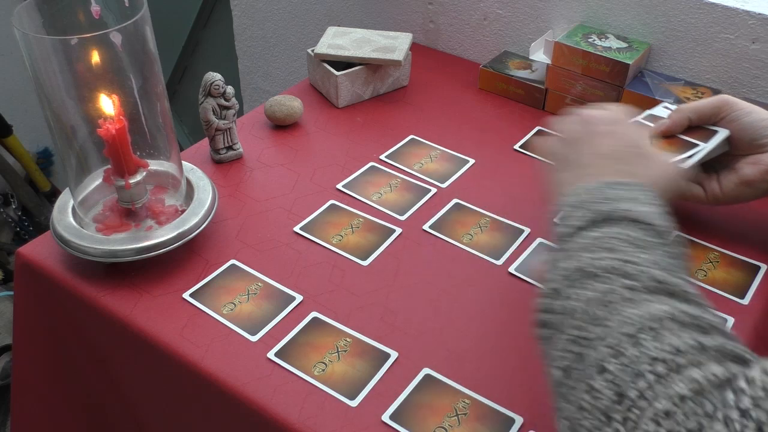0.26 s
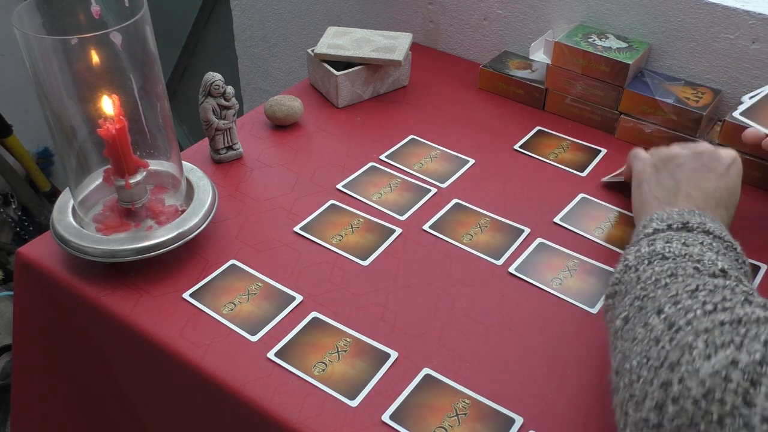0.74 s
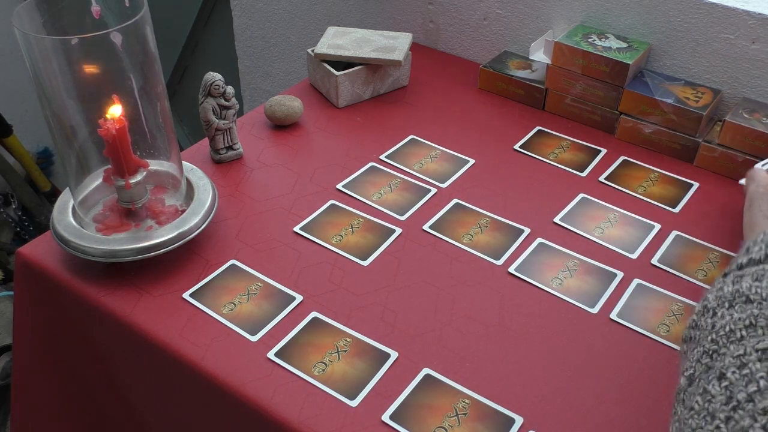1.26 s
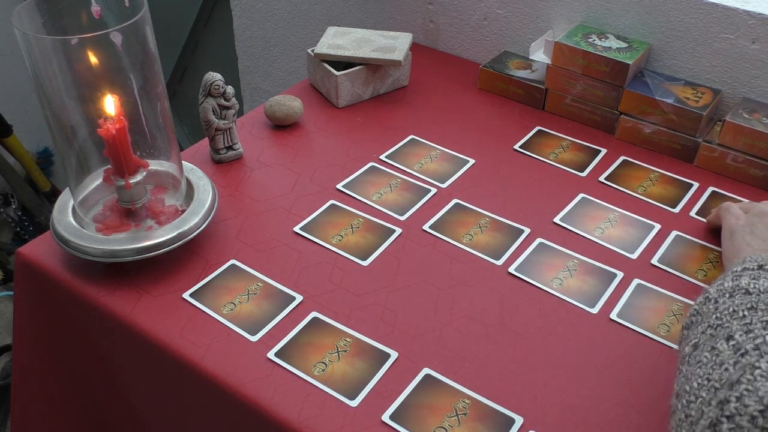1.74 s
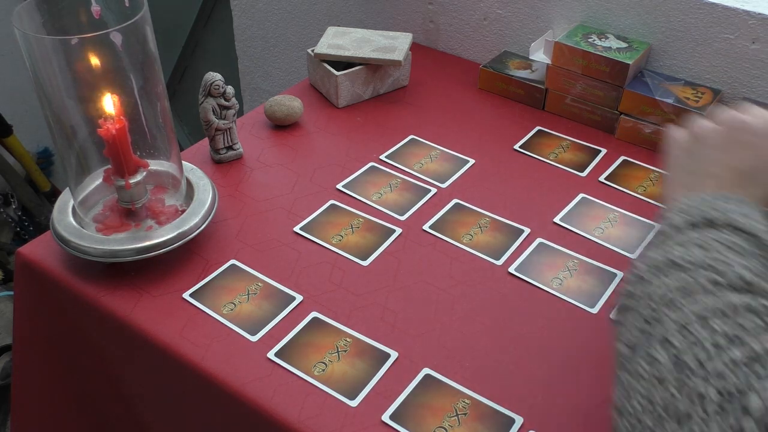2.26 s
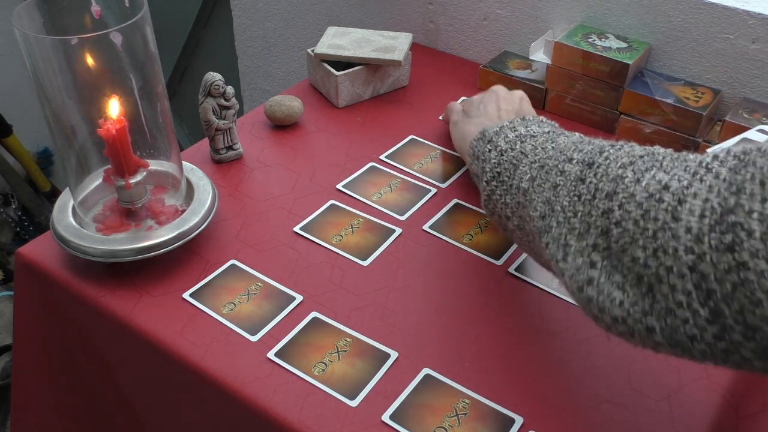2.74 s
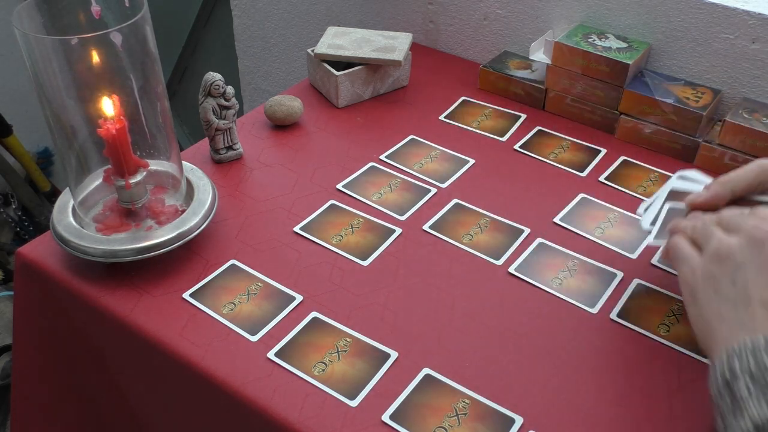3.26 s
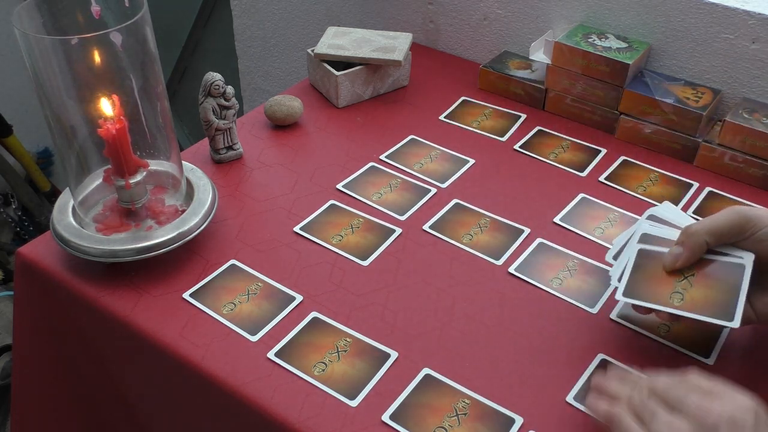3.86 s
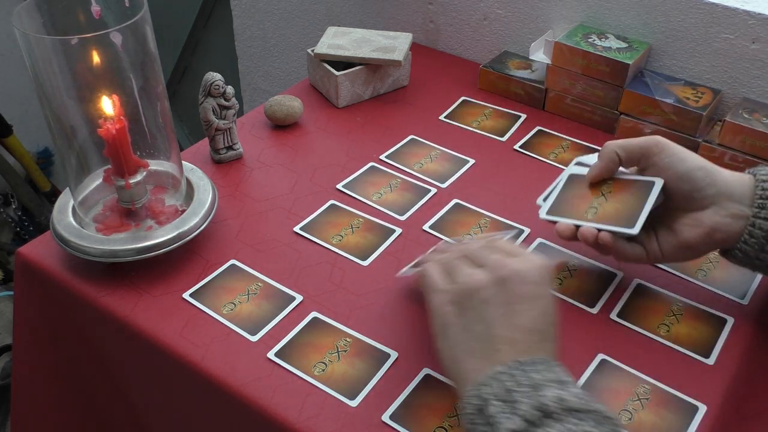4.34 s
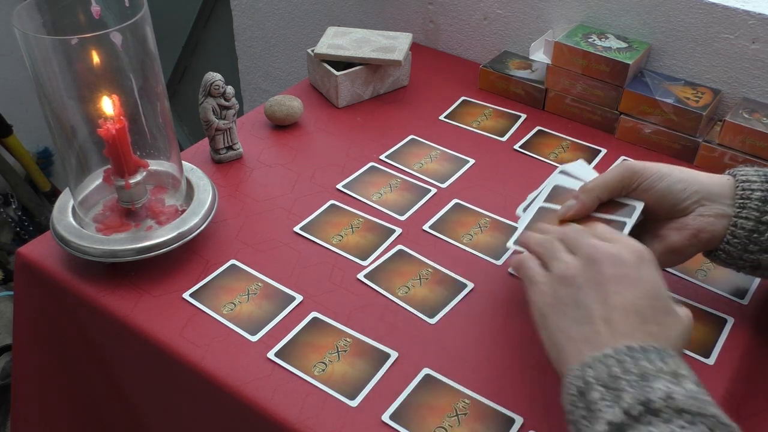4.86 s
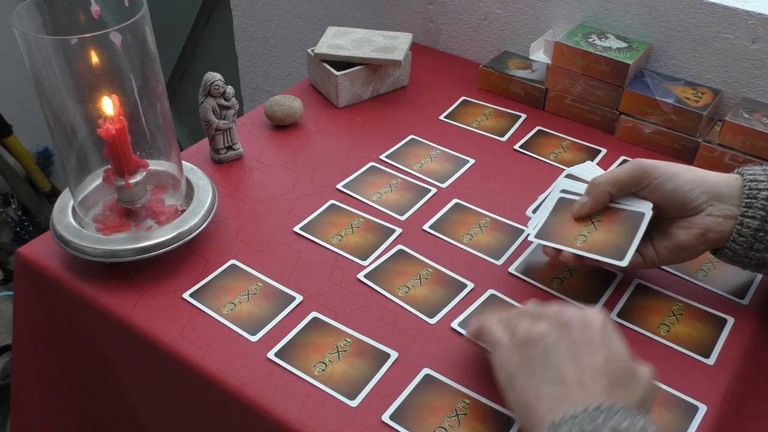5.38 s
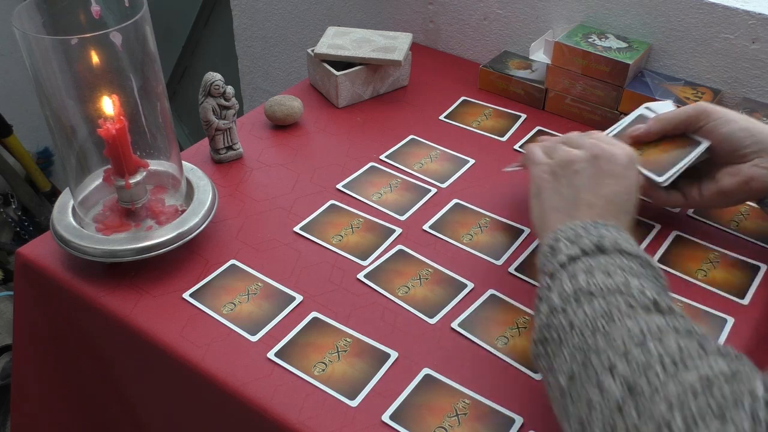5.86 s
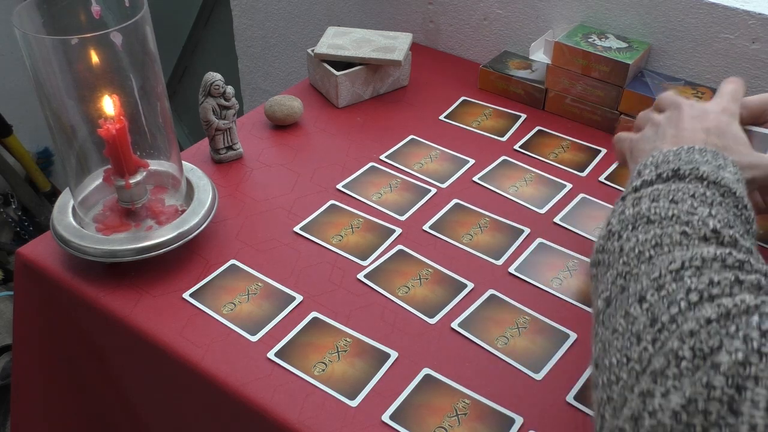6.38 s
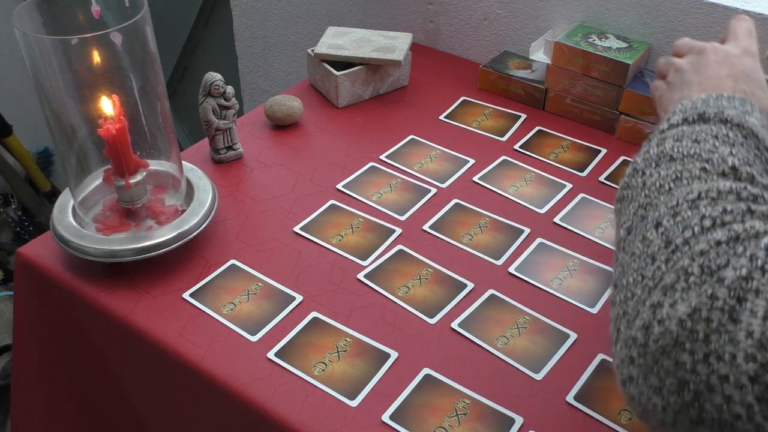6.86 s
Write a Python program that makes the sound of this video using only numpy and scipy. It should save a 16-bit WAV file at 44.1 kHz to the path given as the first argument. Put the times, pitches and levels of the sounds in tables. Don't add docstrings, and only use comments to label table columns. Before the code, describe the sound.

Close, crisp card flicks, slaps and short papery scrapes on a cloth-covered wooden table, with faint table knocks and unsteady background hiss.

```python
import sys
import numpy as np
from scipy import signal
from scipy.fft import rfft, irfft, next_fast_len
from scipy.io import wavfile
from scipy.ndimage import uniform_filter1d, minimum_filter1d

SR = 44100
rng = np.random.default_rng(int(sys.argv[2]) if len(sys.argv) > 2 else 0)


def how_loud(loudness_db):
    steps = np.asarray(loudness_db, float) / 20
    return 10 ** steps


def log_audio(samples):
    frames = np.atleast_2d(samples).T
    limited = np.clip(frames, -1, 1)
    pcm = np.round(limited * 32767).astype(np.int16)
    wavfile.write(sys.argv[1], SR, pcm)


N = 313986
LIFE = 15000


def unit(x):
    return x / np.sqrt(np.mean(x ** 2) + 1e-20)


def along(points, hz):
    f, v = np.transpose(points)
    return np.interp(np.log(hz + 1), np.log(f + 1), v)


def curve(rows):
    s, value = np.transpose(rows)
    return np.interp(np.arange(N) / SR, s, value)


def filtered(x, response):
    size = next_fast_len(x.shape[-1] + 4096)
    spectrum = rfft(x, size) * response(np.fft.rfftfreq(size, 1 / SR))
    return irfft(spectrum, size)[..., :x.shape[-1]]


def causal(gain):
    cepstrum = irfft(np.log(gain + 1e-6))
    half = len(cepstrum) // 2
    cepstrum[1:half] *= 2
    cepstrum[half + 1:] = 0
    return np.exp(rfft(cepstrum, len(cepstrum)))


def patchy(shape, patchy_db, t60=None):
    hz, t, z = signal.stft(rng.standard_normal(shape), SR, nperseg=256)
    field = rng.standard_normal(z.shape[-2:])
    field = uniform_filter1d(field, size=3, axis=0)
    field = uniform_filter1d(field, size=12, axis=1)
    fade_db = 0 if t60 is None else -60 * t / along(t60, hz)[:, None]
    noise = signal.istft(z * how_loud(patchy_db * unit(field) + fade_db), SR, nperseg=256)[1]
    return noise[..., :shape[-1]]


def add(track, s, sound):
    part = track[:, max(round(s * SR), 0):][:, :sound.shape[-1]]
    part += sound[..., :part.shape[-1]]


def card(x, bends_hz, treble_db, bump_db, sharp):
    # (frequency [Hz], level [dB per Hz])
    paper = [(60, -40), (260, -12), (450, -6.5), (563, -15.5), (759, -13.5), (1300, -1.5), (3230, -2.5),
             (3640, -1), (4050, -2), (4230, -1), (5380, -2), (11500, -6.5), (14600, -9.5), (16000, -31)]
    f = np.fft.rfftfreq(LIFE, 1 / SR)
    humps_db = sum(bump_db * np.exp(-(sharp * np.log((f + 1) / hz)) ** 2) for hz in bends_hz)
    shelf_db = (treble_db + 8.5) / (1 + (5000 / (f + 1)) ** 3)
    return irfft(rfft(x) * causal(how_loud(along(paper, f) + humps_db + shelf_db)), LIFE)


def in_room(dry, spread, room_db):
    # (frequency [Hz], t60 [s])
    room_t60 = [(500, 0.29), (2000, 0.24), (5000, 0.28), (10000, 0.21), (16000, 0.17)]
    # (time [s], level [dB])
    walls = [(.0045, -1), (.008, -5), (.012, -6), (.0167, -10), (.024, -4)]
    t = np.arange(LIFE) / SR
    tail = patchy((2, LIFE), patchy_db=2, t60=room_t60) * np.clip((t - 0.003) / 0.0044, 0, 1)
    tail *= 1 + 0.25 * np.exp(-t / 0.013)
    tail /= np.linalg.norm(tail[0])
    for s, db in walls:
        at = round((s + rng.normal(0, 0.0007)) * SR)
        tail[:, at] += how_loud(db - 10.5) * rng.choice([-1, 1], size=2)
    wet = signal.fftconvolve(spread[None], tail, axes=1)[:, :LIFE]
    return dry * [[1], [-0.4]] + how_loud(room_db) * wet


def snaps():
    # (time [s], peak level [dB], low bend [Hz], high bend [Hz])
    flicks = [
        (0.4824, -18, 1200, 2990),
        (1.0257, -6, 4000, 5240),
        (3.7423, -18, 2770, 8500),
        (5.2603, -5, 1610, 9400),
        (6.1724, -8, 4400, 6700),
        (6.3394, -20, 1140, 6400),
    ]
    ticks = [
        (1.0153, 5, 2420, 3280),
        (3.2163, -17.5, 3070, 4630),
        (3.3126, -24, 2270, 3820),
        (3.361, -18.5, 1880, 3490),
        (3.6485, -13.5, 1420, 5140),
        (3.8938, -9.5, 3000, 4540),
        (4.1148, -20.5, 1650, 3800),
        (4.1371, -11, 3020, 4130),
        (5.7105, -13.5, 1250, 3650),
        (6.1629, -1, 1770, 3850),
    ]
    edges = [
        (4.7304, -15.5, 4050, 6300),
        (0.1526, 3.5, 2730, 4960),
        (1.3906, -14, 1960, 3180),
        (2.1295, -12.5, 1900, 3800),
        (2.3289, 1, 1030, 3200),
        (2.6, -1, 3220, 5600),
        (5.1724, -17.5, 2150, 4430),
        (5.438, -14, 1420, 3870),
        (5.7628, -6.5, 1270, 3480),
        (6.219, 0.5, 2450, 4900),
    ]
    pats = [
        (2.2205, -0.5, 1090, 5300),
        (2.7601, -1, 1890, 3150),
        (3.382, -18, 1400, 2940),
        (3.6856, -11.5, 1700, 3970),
        (5.021, -23.5, 1380, 3500),
        (5.2113, -7.5, 1320, 2100),
        (5.237, -9.5, 1194, 2840),
        (5.5553, -9, 1130, 5700),
        (6.0425, -0.5, 2150, 3180),
    ]
    flops = [
        (4.476, -8, 1650, 2550),
        (1.8332, -15, 1680, 3500),
        (0.4744, -24, 1030, 3580),
        (0.824, -10, 1400, 2500),
        (1.2, -28, 2500, 3630),
        (1.2, -28, 1450, 4220),
        (1.2, -26, 1700, 2500),
        (1.6424, -15, 1700, 3900),
        (6.0326, -10, 1700, 5200),
    ]
    # (events, treble [dB], room [dB])
    kinds = [(flicks, -4.5, -10.5), (ticks, -15, -6), (edges, -13, -3.5), (pats, -23, -4), (flops, -10.5, 3.6)]
    out, t = np.zeros((2, N)), np.arange(LIFE) / SR
    for rows, treble_db, room_db in kinds:
        for s, peak_db, low_hz, high_hz in rows:
            burst = rng.standard_normal(LIFE) * np.exp(-t / 0.0019) * (1 - np.exp(-t / 0.00032))
            pulse = np.roll(t == 0, 12) * np.linalg.norm(burst)
            bends_hz = (low_hz, high_hz)
            click = card(burst + 0.43 * pulse, bends_hz, treble_db - 4, bump_db=10.5, sharp=4.7)
            spread = card(0.3 * burst + pulse, bends_hz, treble_db, bump_db=8.5, sharp=7)
            level = how_loud(peak_db) / np.abs(click).max()
            add(out, s + 0.00024, level * in_room(click, spread, room_db + 6))
    return out


def slides():
    # (time of loudest moment [s], rms level [dB], card pitch [Hz], length [s])
    draws = [(0.04, -31, 2500, 0.084), (0.14, -15.5, 1200, 0.0043), (0.633, -18.5, 3160, 0.051),
             (0.716, -28.5, 2500, .038), (.878, -11.5, 2360, 0.038), (1, -25.5, 2500, 0.046),
             (1.366, -25, 4000, 0.03), (1.508, -19, 3300, 0.024), (1.85, -26, 3650, 0.07),
             (2.297, -14.5, 1150, 0.0063), (2.311, -24, 1100, .0045), (2.315, -12.5, 1930, 0.017),
             (3.7, -26, 3900, 0.019), (3.867, -34.5, 4000, 0.023), (5.022, -36, 2520, 0.039),
             (5.137, -32, 2500, 0.056), (5.21, -18, 1300, .0065), (5.442, -17, 1500, 0.0047),
             (5.699, -23.5, 3500, 0.014), (5.898, -32, 2500, 0.11), (6.156, -23.5, 1700, 0.014),
             (6.519, -32, 2480, 0.03), (6.781, -38, 3500, 0.033), (7.099, -32.5, 2500, 0.062)]
    # (time of loudest moment [s], rms level [dB], card pitch [Hz], length [s])
    skids = [(.48, -28.5, 2500, 0.089), (0.846, -17, 1400, 0.03), (1.661, -16, 2830, 0.04),
             (2.163, -24, 2960, 0.032), (2.619, -5, 3660, .024), (2.655, -16, 1520, 0.056),
             (3.201, -40.5, 2500, .053), (3.365, -34, 3500, 0.048), (3.76, -30.5, 2500, 0.022),
             (3.891, -23.5, 1450, 0.0092), (4.303, -37, 2430, 0.058), (4.33, -62, 5800, 0.017),
             (4.501, -15.5, 2090, 0.025), (5.243, -11, 1680, 0.022), (6.037, -5, 9600, 0.0099),
             (6.062, -14.5, 4500, 0.037), (6.627, -32.5, 2440, 0.056)]
    quick_side = 0.45
    strokes = [(s, db, hz, length, quick_side * length) for s, db, hz, length in draws]
    strokes += [(s, db, hz, quick_side * length, length) for s, db, hz, length in skids]
    out = np.zeros((2, N))
    for s, db, hz, rise_s, fall_s in strokes:
        treble_db = -29 - 0.37 * db + 6.5 * np.log2(hz / 2500)
        t = np.arange(LIFE) / SR - min(0.12, s)
        stroke = np.exp(-(t / np.where(t < 0, rise_s, fall_s)) ** 2)
        catch_db = 4 * unit(uniform_filter1d(rng.standard_normal(LIFE), size=60))
        grains = rng.standard_normal(LIFE) * how_loud(catch_db)
        rub = unit(card(grains, [hz], treble_db, bump_db=4, sharp=3.4))
        rub = how_loud(db - 7.5) * stroke * rub
        add(out, s + t[0], in_room(rub, rub, room_db=0.0))
    return out


def knocks():
    # (frequency [Hz], 0 = set by the place pressed; width [Hz], t60 [s])
    parts = [
        (139.6, 6.5, 0.32),
        (0, 32.5, 0.34),
        (1162, 37, 0.28),
        (5020, 79, 0.17),
    ]
    # (time [s], panel level [dB], boards pitch [Hz], boards level [dB])
    presses = [(0.015, -28, 241, -36), (0.154, -27, 414, -23), (0.18, -20.5, 426, -22),
               (0.248, -34, 252, -26.5), (0.441, -27, 403, -36), (0.826, -20.5, 372, -36),
               (0.857, -26, 330, -28), (1.024, -23.5, 423, -18.5), (1.088, -27, 428, -28.5),
               (1.644, -28, 321, -21.5), (1.669, -32, 246, -24), (1.836, -30.5, 326, -29.5),
               (2.224, -30, 234, -24), (2.331, -32, 250.5, -24), (2.613, -39, 330, -22.5),
               (2.657, -34, 416, -23.5), (3.687, -37, 347, -33.5), (3.748, -39, 430, -31.5),
               (4.477, -34.5, 288, -28), (4.49, -45, 700, -35), (5.235, -23.5, 293, -26),
               (5.277, -29, 394, -31.5), (5.44, -35.5, 426, -28.5), (5.556, -33, 414, -25),
               (5.611, -27, 450, -36), (6.042, -26, 414, -23), (6.218, -39, 396, -24),
               (6.248, -25, 453, -27), (6.329, -27, 415, -25), (6.404, -28.5, 439, -34)]
    # (time [s], level [dB])
    dish = [(0.153, -19.5), (0.248, -27), (0.442, -26.5), (0.826, -24), (1.026, -17), (1.088, -31),
            (1.644, -26), (2.612, -21), (2.657, -30), (3.688, -28), (4.475, -24), (5.235, -15),
            (5.438, -34), (5.556, -16.5), (6.041, -24), (6.219, -23), (6.314, -23.5), (6.394, -26),
            (6.43, -34)]
    # (time [s], level [dB])
    glass = [
        (0.153, -13),
        (1.016, -9),
        (1.028, -8.5),
        (2.33, -29),
        (2.612, -22),
        (5.556, -29),
        (6.17, -10.5),
        (6.22, -14),
        (6.249, -18),
        (6.339, -32),
    ]
    panel = [(s, db) for s, db, *_ in presses]
    boards = [(s, db, hz) for s, _, hz, db in presses]
    out, t = np.zeros((2, N)), np.arange(LIFE) / SR
    for blows, (own_hz, width_hz, t60_s) in zip([panel, boards, dish, glass], parts):
        for s, db, *place_hz in blows:
            hz = own_hz or place_hz[0]
            fade = how_loud(-60 * t / t60_s) * (1 - np.exp(-t / 0.003))
            drift = np.cumsum(rng.standard_normal(LIFE)) * np.sqrt(2 * np.pi * width_hz / SR)
            beat = uniform_filter1d(rng.standard_normal(LIFE), size=int(SR / (width_hz + 20)))
            ring = how_loud(db + 2.5 * unit(beat)) * np.sin(2 * np.pi * hz * t + drift)
            ring = filtered(ring, lambda f: 1 / (1 + ((f - hz) / (2 * width_hz)) ** 4))
            add(out, s, fade * ring * [[1], [0.3]])
    return out


def thumps():
    # (time [s], level [dB])
    rests = [
        (0.999, -47),
        (1.129, -48),
        (3.349, -61),
        (3.646, -46),
        (3.89, -42),
        (4.135, -50),
        (5.249, -47),
        (6.519, -46),
    ]
    t60_s = 0.37
    out, t = np.zeros((2, N)), np.arange(LIFE) / SR
    for s, db in rests:
        noise = rng.standard_normal(LIFE)
        push = unit(filtered(noise, lambda f: np.exp(-(np.log((f + 1) / 68) / 0.32) ** 2)))
        add(out, s, how_loud(db - 60 * t / t60_s) * (1 - np.exp(-t / 0.0093)) * push * [[1], [0.3]])
    return out


def hiss():
    # (time [s], level [dB])
    ride = [(0.0, -29.5), (0.44, -32.5), (0.97, -30), (1.37, -33.5), (1.66, -30), (2.34, -33), (2.7, -30.5),
            (2.83, -42), (3.01, -47.5), (3.65, -45), (4.14, -48.5), (4.7, -39.5), (5.04, -42),
            (5.31, -36.5), (6.0, -40.5), (6.3, -35), (6.6, -40.5), (7.12, -36.5)]
    # (time [s], level [dB])
    motor = [
        (2.3, -75),
        (2.4, -40.5),
        (2.8, -40.5),
        (2.9, -52),
        (3.2, -52.5),
        (3.3, -63),
    ]
    # (frequency [Hz], level [dB per Hz])
    air_hz_db = [(280, -9.5), (480, -3.5), (536, -18.5), (668, -6.5), (784, -10.5), (865, -6), (1200, 0),
                 (1430, -1), (1870, -3.5), (2310, -2.5), (5650, -11), (8160, -18), (9000, -23),
                 (11700, -37), (19800, -120)]
    rumble_hz_db = [(18, -60), (30, -18), (91, -10), (145, -2.5), (180, -3.5), (237, -2), (363, -4),
                    (445, -8.5), (520, -10.5), (680, -27), (1140, -120)]
    fizz_hz_db = [(5060, -33), (8600, 1), (9740, 11), (15100, 10), (16000, 6), (16200, -18)]
    # (time [s], lift [dB], length [s])
    sleeve = [
        (3.803, 11, 0.19),
        (4.147, 2.5, 0.049),
        (4.78, 6.5, 0.065),
        (6.19, 6.5, 0.15),
    ]

    def layer(spectrum, patchy_db):
        return unit(filtered(patchy((2, N), patchy_db), lambda f: how_loud(along(spectrum, f))))

    t = np.arange(N) / SR
    db = curve(ride)
    sleeve_db = sum(lift_db * np.exp(-((t - s) / length) ** 2) for s, lift_db, length in sleeve)
    air = layer(air_hz_db, patchy_db=0.8)
    rumble = how_loud(-6.5 + sleeve_db) * layer(rumble_hz_db, patchy_db=0)
    fizz_db = -10.5 + (0.78 - 1) * (db - db.mean())
    fizz = how_loud(fizz_db) * layer(fizz_hz_db, patchy_db=0)
    hum = how_loud(curve(motor)) * np.sin(2 * np.pi * 158 * t) * [[1], [0]]
    return how_loud(db) * (air + rumble + fizz) + hum


def scene():
    # (frequency [Hz], side minus mid [dB])
    width = [(60, -6.5), (95, -15), (150, -21.5), (240, -21.5), (380, -25.5), (600, -19.5), (950, -29),
             (1500, -26), (2380, -20.5), (3770, -18), (5980, -9.5), (9470, -10.5), (15000, -33)]
    mid, side = snaps() + slides() + knocks() + thumps() + hiss()
    side = filtered(side, lambda f: how_loud(along(width, f)))
    return np.array([mid + side, mid - side])


def band_limit(x):
    return signal.sosfilt(signal.butter(12, 16340, fs=SR, output="sos"), x)


def record(dry):
    # (time [s], level [dB])
    duck = [
        (2.7535, 0),
        (2.757, -14),
        (2.7598, -14),
        (2.7605, 0),
    ]
    low_cut_hz, top_hz = 21.4, 16300
    mix = filtered(dry, lambda f: (f < top_hz) * f ** 2 / (f ** 2 + low_cut_hz ** 2))
    mix = mix * how_loud(curve(duck))
    need = np.minimum(1, 0.99 / (np.abs(mix).max(axis=0) + 1e-9))
    gain = uniform_filter1d(minimum_filter1d(need, size=61), size=31)
    return band_limit(mix * gain)


dry = scene()
out = record(dry)
log_audio(out)
```